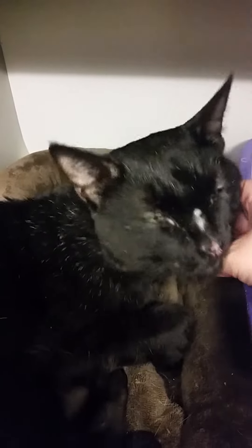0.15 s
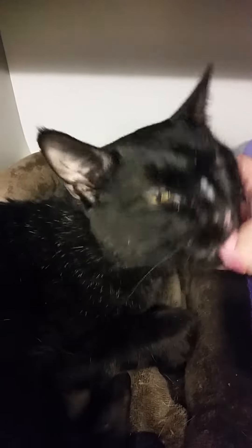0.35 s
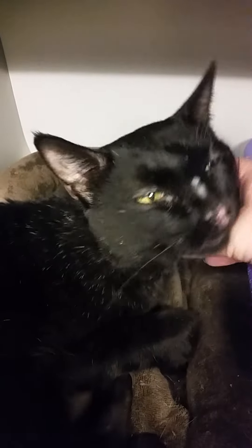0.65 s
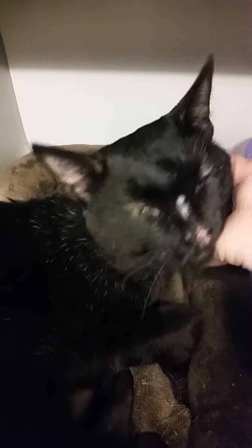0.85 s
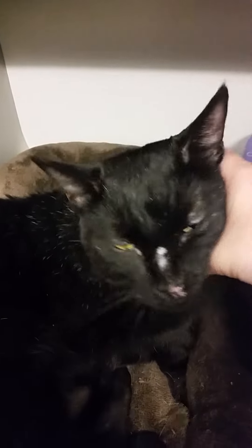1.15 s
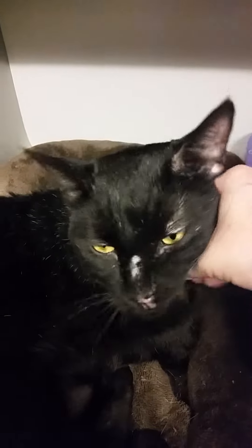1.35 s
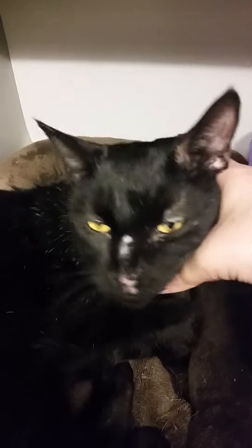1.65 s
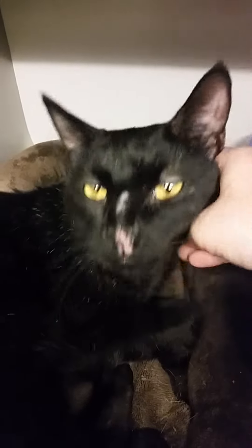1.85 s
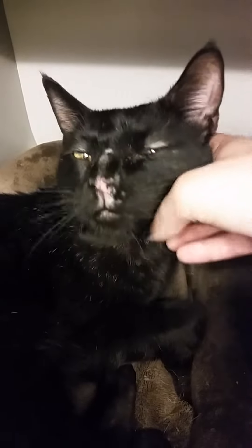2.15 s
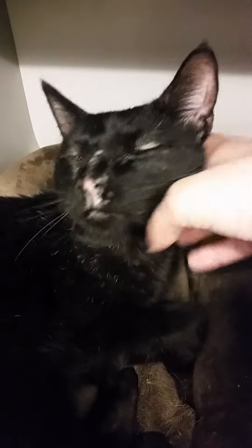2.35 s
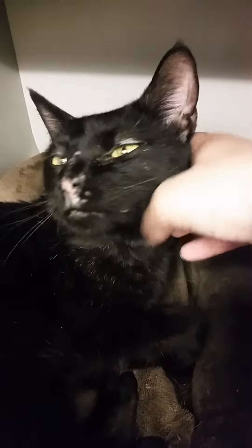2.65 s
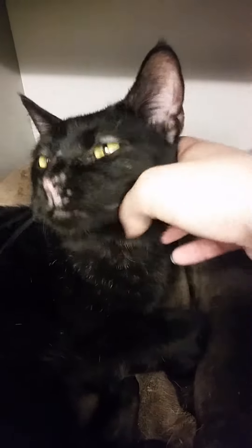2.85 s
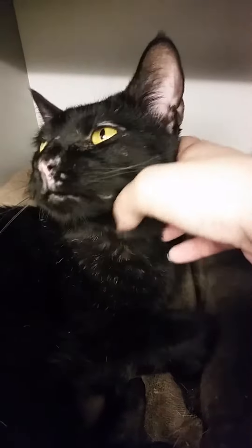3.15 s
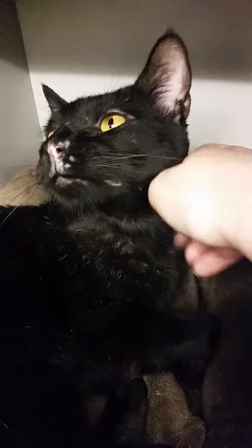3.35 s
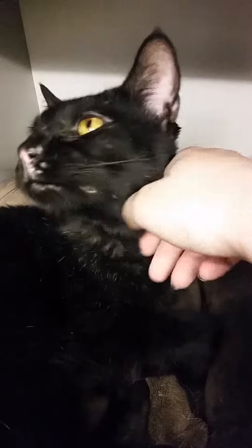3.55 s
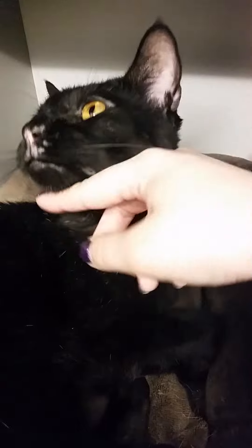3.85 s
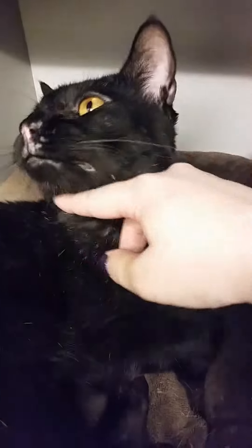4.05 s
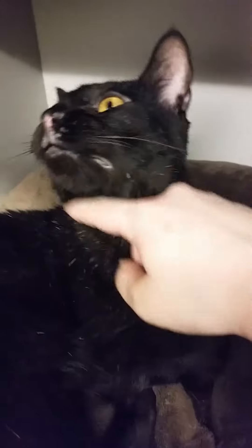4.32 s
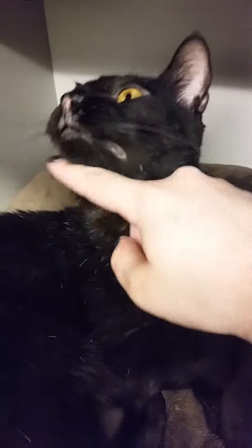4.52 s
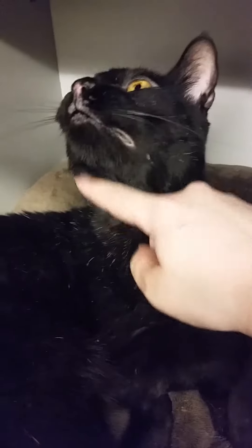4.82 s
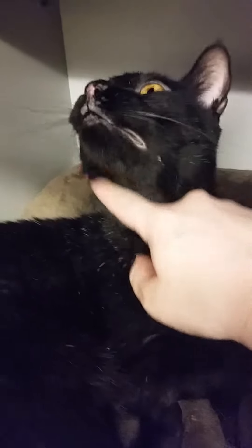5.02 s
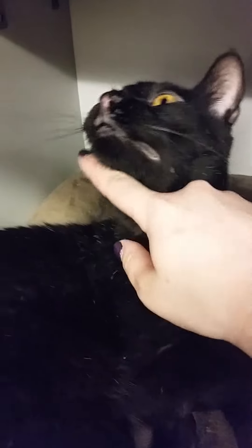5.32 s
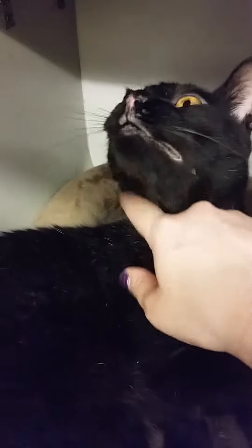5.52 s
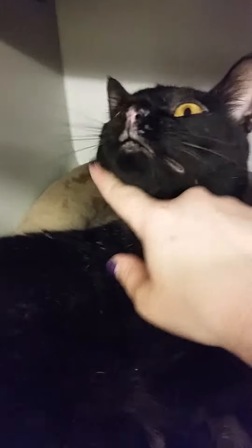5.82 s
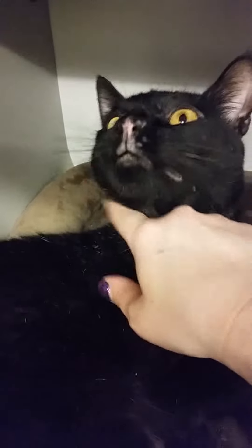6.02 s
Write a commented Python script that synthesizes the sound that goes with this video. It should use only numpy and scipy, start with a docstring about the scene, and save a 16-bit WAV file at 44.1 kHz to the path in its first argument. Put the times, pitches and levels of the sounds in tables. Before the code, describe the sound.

Constant deep mechanical droning and boxy airflow indoors, wavering gently, while a cat's licks add tiny, barely noticeable wet clicks in the first second.

```python
"""Fan from the mouth of a cubicle

A mains-driven fan runs in a room; two microphones stand at the mouth of a small hard-walled cubicle.
Its shaft orders are held sines, and the mains hum beats slowly against them. The rush of air is shaped
noise that excites the resonances of room and cubicle, which reach the microphones unequally.
A cat's tongue gives a few wet ticks, as noise bursts; late on, the microphones turn once."""
import sys
import numpy as np
from scipy import signal
from scipy.fft import rfft, irfft
from scipy.io import wavfile

SR = 44100
rng = np.random.default_rng(int(sys.argv[2]) if len(sys.argv) > 2 else 0)


def log_audio(samples):
    """Write samples as a 16-bit WAV file to the path given in sys.argv[1]."""
    # one column per channel
    frames = np.atleast_2d(samples).T
    # limit to full scale, then quantise
    limited = np.clip(frames, -1, 1)
    pcm = np.round(limited * 32767).astype(np.int16)
    wavfile.write(sys.argv[1], SR, pcm)


def attenuation_scalar(level_db):
    """Turn a level in dB into a linear amplitude multiplier (20 dB per decade)."""
    decades = np.asarray(level_db, float) / 20
    return 10 ** decades


N = 272538   # samples, about 6.18 s

# In all tables pan_db is left over right, and left_leads_rad is the phase lead of the left microphone.
# Tone levels are rms midway between the microphones, before the slow waver.

# steady tones locked to the shaft: order [multiple of shaft speed], level_db, pan_db, left_leads_rad
SHAFT_ORDERS = [(2, -44, -2, 0.05), (4, -36.5, 1, .1), (5, -37, 0, .1), (6, -28.5, -0.4, 0.045),
                (7, -48.5, -1.5, .2), (8, -52, 1, .1), (10, -61, -7, .3), (12, -54, -8.5, 0.16),
                (14, -41, -2, .2), (20, -45.5, 2.5, .4), (36, -49.5, -8, 0.26)]
# magnetic hum at twice the mains rate and its sidebands from the turning shaft:
# order_added [multiple of shaft speed], level_db, pan_db, left_leads_rad
MAINS_SIDEBANDS = [(0, -47, -2, .2), (-1, -37.5, 0.5, 0.05), (-2, -37, -0.5, .1), (2, -54.5, 3, 1),
                   (36, -49, -1.5, 1.5)]
# shaft speed, hunting slowly with the load: time_s, speed [turns per s]
SHAFT_SPEED = [(0.0, 17.122), (0.35, 17.13), (1.05, 17.174), (1.9, 17.091), (2.7, 17.108), (3.3, 17.099),
               (4.0, 17.163), (4.5, 17.132), (5.5, 17.02), (6.18, 17.058)]
# loudest tone, the eighteenth shaft order: time_s, level_db
BLADE_LEVEL = [(0, -26), (1.5, -25), (2, -23), (3.1, -25.5), (3.9, -24), (5, -25.5), (6.18, -22)]
# room and cubicle resonances excited by the air, before the gaps and the moving colour:
# pitch_hz, width_hz, level_db [per Hz, at the top], pan_db, left_leads_rad
ROOM_RESONANCES = [(22.0, 3.5, -68, -2.5, 1), (82.4, 25, -52, -1, 0.16), (95.2, 11.5, -47.5, -1.5, 0.23),
                   (99.7, 4.4, -42, -0.3, 0.1), (128.0, 25, -63.5, -1.0, 0.2),
                   (214.4, 40, -55.5, -4.5, -0.1), (248.2, 27, -47.5, -1.2, -0.65),
                   (273, 19, -46, -3.5, -0.16), (293.3, 22.4, -46.5, -5, 0.17), (320, 12.0, -54.5, -4.5, 1),
                   (340.8, 26.2, -49.5, -3, 0.44), (430.4, 32, -67, 19, 1.5), (476, 13, -70.5, 3, -7.5),
                   (546.7, 18, -55.5, -11, -1.5), (568.3, 38.4, -54, -8, -0.2),
                   (600.7, 16, -57.5, -8.5, 0.4), (611.4, 11, -54.5, -6.5, 0.4), (632, 11, -63.5, 1, 1),
                   (662, 15, -64, -2, .5), (689.2, 44.5, -54, -2, 0.3), (725, 25, -57, -9.5, 2),
                   (771, 43, -68, 18.5, 1.5), (851, 147, -65, -6, 0), (924, 27, -66.5, -20, 1.6),
                   (973, 153, -79, 24, 2.5), (1152, 204, -70, -3.5, 1.5), (1225, 89, -70.5, 2, -1),
                   (1319, 49, -70.5, 5.5, 1), (1500, 96, -81, 5, -0.7), (1574, 12, -74.5, 3, 0),
                   (1845, 59, -76.5, -0.5, 1), (2010, 60, -79.5, -7, 1.8), (2500, 93, -79.5, -4, 0.5),
                   (2738, 72, -81, -6.5, 0.5), (4240, 60, -89.5, -3, -1.3)]
# diffuse rush and hiss, before the gaps and the moving colour:
# pitch_hz, level_db [per Hz], pan_db, likeness [left to right, 0-1]
AIR_RUSH = [(15, -93.5, -1.5, .8), (40, -84.5, -3.5, .8), (150, -83, -6, 0.4), (300, -76, -9.5, 0.05),
            (990, -84.5, -11, 0.05), (1430, -75, 1, 0.27), (1770, -77, -1.5, 0.3), (2770, -79.5, -2, 0.3),
            (4410, -87, -4.5, 0.11), (6400, -96.5, -2.5, .1), (8000, -98, 9.5, .05),
            (10400, -95.5, -1, .05), (10500, -100, 0.5, .05), (11500, -104, 3, .05),
            (14000, -116, 8.5, .05)]
# narrow gaps where paths cancel: pitch_hz, width_hz, depth_db [negative]
CANCELLED_GAPS = [(157, 9, -8.5), (380, 27, -1.5), (522, 9.8, -4), (624, 9, -10.5), (735, 9, -10),
                  (891, 12, -4.5), (972, 45, -3.5)]
# bands that the turn of the microphones changes: low_hz, high_hz, before_db, after_db
TURNED_BANDS = [(190, 240, -0.6, 3), (493, 1000, 0.4, -2), (1000, 2250, -0.14, 1), (2280, 2540, -0.2, 4),
                (2650, 4500, 0, 0.5), (5000, 12500, 0.4, 1)]
# small wet ticks of a cat's tongue: start_s, level_db [of the ringing, before its band filter], pitch_hz
TONGUE_TICKS = [(0.3123, -43.5, 9300), (.324, -53, 9600), (.581, -51, 10300), (.658, -50, 8200),
                (.694, -52.5, 9000)]

MAINS_HUM_HZ = 120
MAINS_AHEAD_RAD = 1.75   # lead of the mains hum over the shaft at the start: sets when the beats swell
BLADE_AHEAD_RAD = 2.16   # phase of the loudest tone at the start
# the microphones turn once, late: the boom near 600 Hz sinks and the hiss near 2500 Hz rises
TURN_START_S, TURN_LENGTH_S = 4.8, 0.89
TICK_WIDTH_SHARE, TICK_DECAY_S = 0.25, 0.004   # bandwidth over centre; decay time of the ringing
# the brighter, shorter snap that opens each tick; its level is relative to the ringing
SNAP_HZ, SNAP_DECAY_S, SNAP_DB = 12300, 0.0009, 1.5


def to_ears(pan_db, left_leads_rad):
    """Complex gains of the left and right microphone: level and phase split evenly about the middle."""
    sides = np.array([[0.5], [-0.5]])
    return attenuation_scalar(pan_db * sides) * np.exp(1j * left_leads_rad * sides)


def white(count):
    """Spectra of unrelated white noise with unit power per Hz."""
    return rfft(rng.standard_normal((count, N))) * np.sqrt(SR / 2)


def drift(rate_hz):
    """Slow chance with spread 1: noise through two equal low-pass poles at rate_hz."""
    hop = 100   # samples between slow values
    pole = np.exp(-2 * np.pi * rate_hz * hop / SR)
    noise = rng.standard_normal(N // hop + 2002)
    slow = signal.lfilter([1], [1, -2 * pole, pole * pole], noise)[2000:]   # skip the run-in
    return np.interp(np.arange(N) / hop, np.arange(len(slow)), slow / slow.std())


def fan_tones(waver_db=0.86):
    """Sines locked to the shaft angle; the mains sidebands beat against them at the slip rate."""
    t = np.arange(N) / SR
    speed = np.interp(t, *np.transpose(SHAFT_SPEED))
    shaft = 2 * np.pi * np.cumsum(speed) / SR
    mains = 2 * np.pi * MAINS_HUM_HZ * t + MAINS_AHEAD_RAD
    blade_db = np.interp(t, *np.transpose(BLADE_LEVEL))
    tones = [(18 * shaft + BLADE_AHEAD_RAD, blade_db, -4.0, 0.27)]
    # odd orders lie a quarter cycle off: neighbouring lines waver in pitch rather than throb
    for order, level_db, pan_db, lead in SHAFT_ORDERS:
        quarter = round(order) % 2 * np.pi / 2
        tones.append((round(order) * shaft + quarter, level_db, pan_db, lead))
    for order, level_db, pan_db, lead in MAINS_SIDEBANDS:
        tones.append((mains + round(order) * shaft, level_db, pan_db, lead))
    total = np.zeros((2, N))
    for phase, level_db, pan_db, lead in tones:
        peak = np.sqrt(2) * attenuation_scalar(level_db + waver_db * drift(2.1))
        total += peak * np.imag(to_ears(pan_db, lead) * np.exp(1j * phase))
    return total


def resonant_air(hz):
    """Air noise rings each resonance, applied twice for steep skirts."""
    sources = white(count=4)   # neighbours in pitch get unrelated noise
    total = 0
    for k, (centre, width, level_db, pan_db, lead) in enumerate(ROOM_RESONANCES):
        shape = 1 / (1 + (2 * (hz - centre) / width) ** 2)
        total = total + attenuation_scalar(level_db) * to_ears(pan_db, lead) * sources[k % 4] * shape
    return total


def echoes(hz, count, echo_db, longest_s):
    """A direct path and a few wall echoes for each microphone: a fixed ripple in the spectrum."""
    lags_s = rng.uniform(0.000996, longest_s, (2, count))
    signs = rng.choice([-1, 1], (2, count))
    paths = 1
    for k in range(count):
        paths = paths + attenuation_scalar(echo_db) * signs[:, [k]] * np.exp(-2j * np.pi * hz * lags_s[:, [k]])
    return paths / np.sqrt(1 + count * attenuation_scalar(2 * echo_db))   # keeps the mean power


def rush(hz):
    """Broad noise, part shared by both microphones through their own echoes, part unrelated."""
    pitch_hz, *columns = np.transpose(AIR_RUSH)
    level_db, pan_db, likeness = [np.interp(np.log(hz + 1), np.log(pitch_hz), c) for c in columns]
    likeness = np.clip(likeness, 0, 1)
    shared, *own = white(count=3)
    echoed = shared * echoes(hz, count=6, echo_db=-6.5, longest_s=0.025)
    mix = np.sqrt(likeness) * echoed + np.sqrt(1 - likeness) * np.array(own)
    return attenuation_scalar(level_db + pan_db * np.array([[0.5], [-0.5]])) * mix


def gaps(hz):
    """Gain that dips at each pitch where paths cancel."""
    return attenuation_scalar(sum(depth_db / (1 + (2 * (hz - centre) / width) ** 2)
                   for centre, width, depth_db in CANCELLED_GAPS))


def moving_colour(air, hz):
    """Parts of the spectrum follow the turn of the microphones and flicker a little on their own."""
    progress = np.clip((np.arange(N) / SR - TURN_START_S) / TURN_LENGTH_S, 0, 1)
    turned = (1 - np.cos(np.pi * progress)) / 2   # eases in and out
    out = irfft(air, N)
    for low_hz, high_hz, before_db, after_db in TURNED_BANDS:
        band = 1 / (1 + (low_hz / (hz + 1)) ** 8) / (1 + (hz / high_hz) ** 8)
        flicker_db = 0.51 * drift(2.6)
        gain = attenuation_scalar(before_db + (after_db - before_db) * turned + flicker_db)
        out = out + (gain - 1) * irfft(band * air, N)
    return out


def burst(noise, start_s, level_db, pitch_hz, decay_s):
    """Noise that starts at once and dies away, in a band around pitch_hz."""
    t = np.arange(N) / SR
    edges_hz = pitch_hz * (1 + TICK_WIDTH_SHARE * np.array([-0.5, 0.5]))
    envelope = attenuation_scalar(level_db) * (t >= start_s) * np.exp(-np.abs(t - start_s) / decay_s)
    shaped = envelope * noise / np.sqrt(TICK_WIDTH_SHARE)   # makes up for power lost to the band
    band = signal.butter(2, edges_hz, "band", fs=SR, output="sos")
    return signal.sosfilt(band, shaped + 1e-18)


def tongue_ticks():
    """Each tick is a bright snap and a lower ringing of a few ms, equal in both microphones."""
    noise = rng.choice([-1., 1.], N)
    total = np.zeros(N)
    for start_s, level_db, pitch_hz in TONGUE_TICKS:
        total += burst(noise, start_s, level_db, pitch_hz, TICK_DECAY_S)
        total += burst(noise, start_s, level_db + SNAP_DB, SNAP_HZ, SNAP_DECAY_S)
    return total


def scene():
    """Fan tones, gusting air coloured by the place, and ticks, summed at the two microphones."""
    hz = np.arange(N // 2 + 1) * SR / N
    gusts = attenuation_scalar(0.24 * drift(4.1))
    air = gaps(hz) * (resonant_air(hz) + rush(hz))
    return fan_tones() + gusts * moving_colour(air, hz) + tongue_ticks()


def roll_off(x):
    """The treble ends steeply here."""
    return signal.sosfilt(signal.butter(12, 14010, fs=SR, output="sos"), x)


def record(dry):
    """Takes the finished two-microphone mix through the recorder, whose treble ends near 14 kHz."""
    return roll_off(dry)


dry = scene()
out = record(dry)
log_audio(out)
```